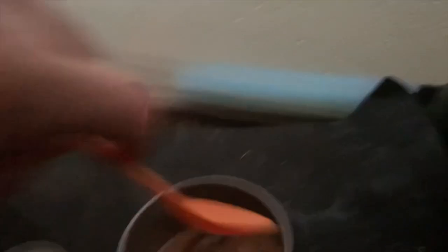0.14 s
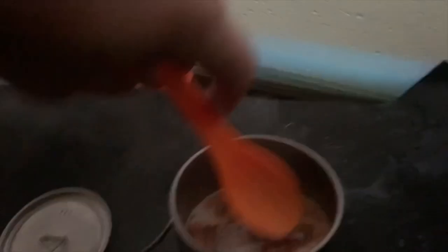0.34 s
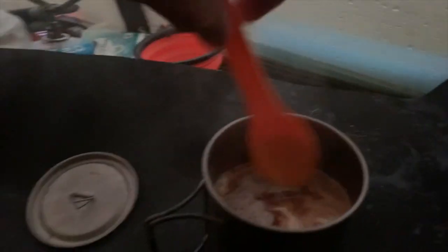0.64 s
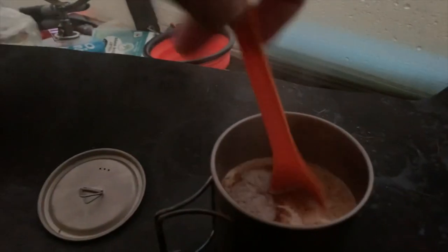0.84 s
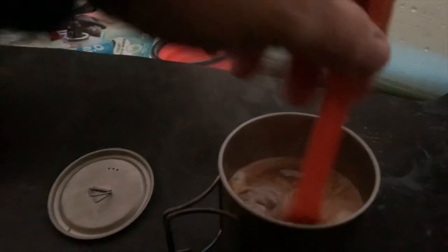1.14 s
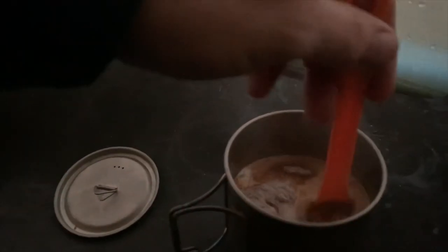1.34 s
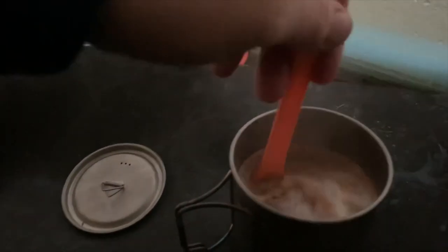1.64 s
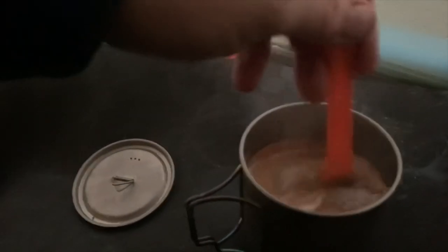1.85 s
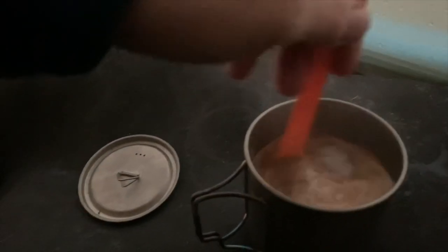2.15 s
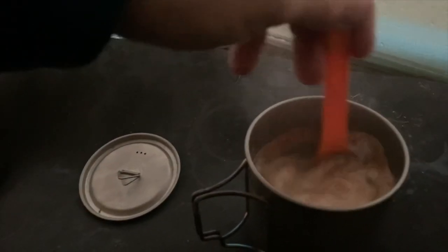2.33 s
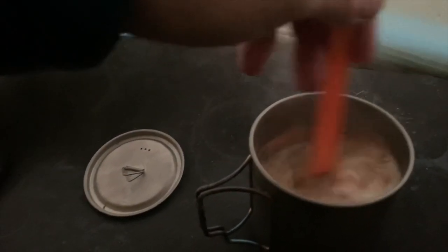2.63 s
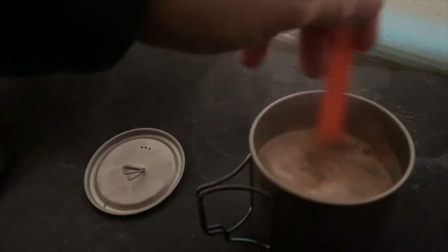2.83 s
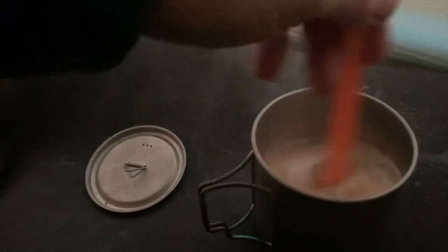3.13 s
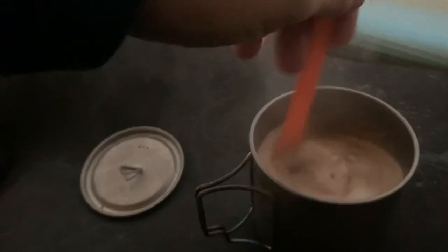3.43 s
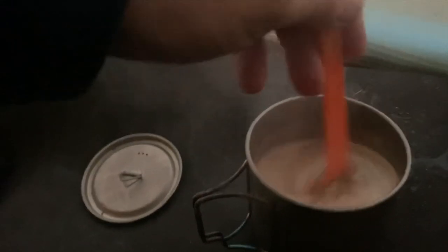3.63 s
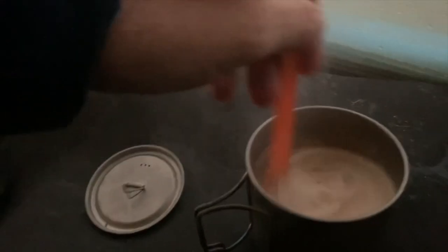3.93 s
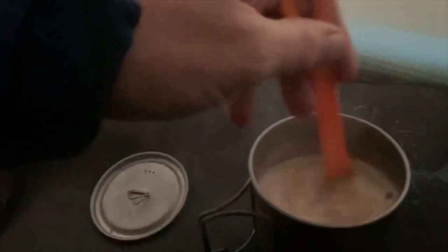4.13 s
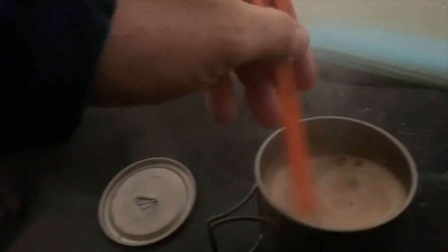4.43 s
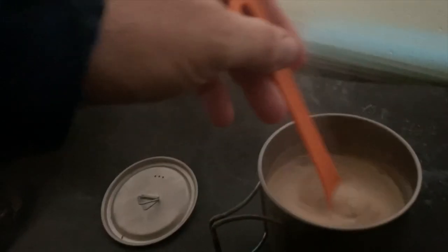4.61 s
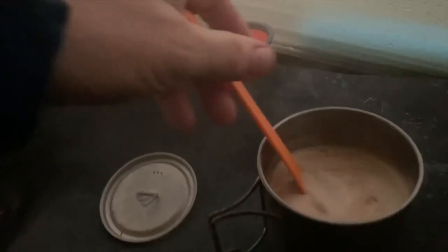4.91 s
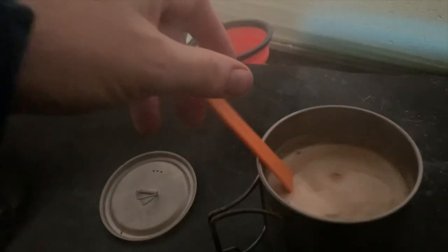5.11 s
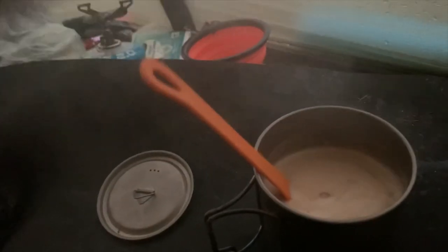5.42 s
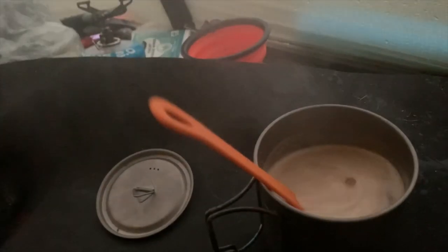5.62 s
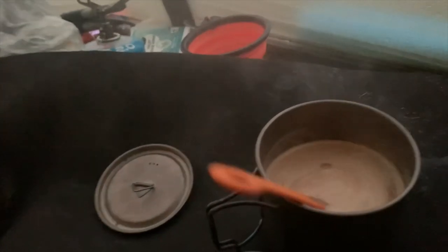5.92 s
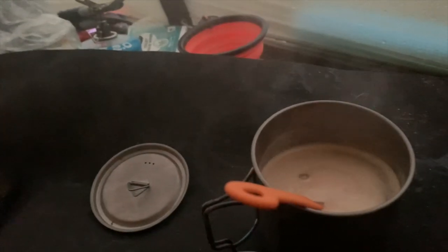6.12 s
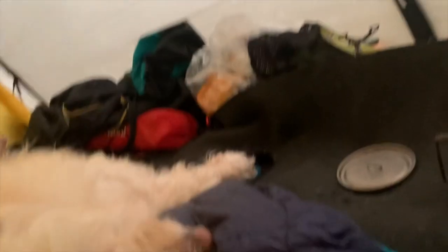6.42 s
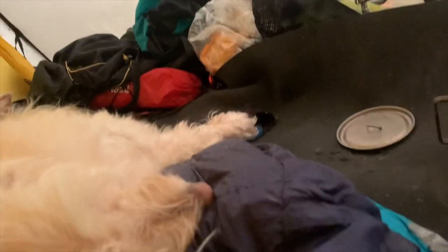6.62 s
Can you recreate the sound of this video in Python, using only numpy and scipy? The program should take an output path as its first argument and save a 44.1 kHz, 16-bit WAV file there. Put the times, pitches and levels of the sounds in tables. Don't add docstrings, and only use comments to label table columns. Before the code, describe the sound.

Inside a tent, dense rain hisses and taps on the cloth while the fly drums low in wind; finally it jumps closer and duller.

```python
import sys
import numpy as np
from scipy import signal
from scipy.fft import rfft, irfft, next_fast_len
from scipy.io import wavfile
from scipy.ndimage import uniform_filter1d

SR = 44100
rng = np.random.default_rng(int(sys.argv[2]) if len(sys.argv) > 2 else 0)


def output_pcm(signal):
    pcm = np.clip(np.atleast_2d(signal).T, -1, 1) * 32767
    wavfile.write(sys.argv[1], SR, np.round(pcm).astype(np.int16))


def nominal_scale(level):
    x = np.asarray(level, float) / 20
    return 10 ** x


N = 298116
CHANGE_S = 6.334


def evened(x):
    return x / np.sqrt(np.mean(x ** 2) + 1e-20)


def read(points, hz):
    f, value = np.transpose(points)
    return np.interp(np.log(hz + 1), np.log(f + 1), value)


def add(mix, s, sound):
    part = mix[:, round(s * SR):][:, :sound.shape[1]]
    part += sound[:, :part.shape[1]]


def shaped(x, gain):
    size = next_fast_len(N)
    spectrum = rfft(x, size) * gain(np.fft.rfftfreq(size, 1 / SR))
    return irfft(spectrum, size)[..., :N]


def wander(hz):
    return evened(shaped(rng.standard_normal(N), lambda f: 1 / (1 + (f / hz) ** 2)))


def follow(curve):
    return np.interp(np.arange(N) / SR, *np.transpose(curve))


def swells(rows, rise=1.0):
    t = np.arange(0, N, 64) / SR
    s, db, half = np.transpose(rows)[:, :, None]
    half = half * np.where((t < s) & (db > 0), rise, 1)
    bells = db * np.exp(-.5 * ((t - s) / half) ** 2)
    return np.interp(np.arange(N) / SR, t, bells.sum(0))


def splash(hz, ms, width, ring_db, rise_s=0.00046):
    t = np.arange(1024) / SR
    decay = np.exp(-t / (ms / 2000)) + 0.32 * np.exp(-t / 0.00085)
    burst = rng.standard_normal((2, 1024)) * decay * np.minimum(t / rise_s, 1)
    r = np.exp(-np.pi * width * hz / SR)
    ring = signal.lfilter([1, 0, -1], [1, -2 * r * np.cos(2 * np.pi * hz / SR), r * r], burst)
    both = burst / np.linalg.norm(burst) + nominal_scale(ring_db) * ring / np.linalg.norm(ring)
    return both / abs(both).max(1)[:, None]


# (time [s], change [dB], half length [s])
FLURRIES = [(0.075, 2.5, 0.039), (0.21, -2.5, 0.036), (0.439, -5, 0.011), (0.479, 8, 0.0053),
            (0.534, -1.5, 0.0046), (0.599, -5.5, 0.017), (0.723, -6, 0.008), (0.798, 7, 0.0072),
            (0.833, -3.5, 0.0093), (0.873, -1.5, 0.01), (0.933, 1, 0.012), (1.212, 1, 0.087),
            (1.472, -4.5, 0.024), (1.551, -1.5, 0.022), (1.611, 2.5, 0.022), (1.721, 3, 0.012),
            (1.921, -6, 0.014), (1.985, 3, 0.0083), (2.385, 5.5, 0.004), (2.444, -6, 0.02),
            (2.584, 2.5, 0.019), (2.898, 9.5, 0.0058), (2.973, 0, 0.042), (3.073, 11.5, 0.0056),
            (3.173, 8, 0.0038), (3.298, -2, 0.011), (3.452, -3, 0.0099), (3.522, 5, 0.024),
            (3.766, -2.5, 0.053), (3.971, 2.5, 0.0088), (4.036, -1, 0.011), (4.31, 3, 0.012),
            (4.879, -5, 0.03), (5.448, -10, 0.0034), (5.862, 0, 0.06), (5.946, 0.5, 0.026),
            (6.036, -5, 0.045), (6.216, -2.5, 0.018), (6.385, 1.5, 0.012), (6.505, 0.5, 0.008),
            (6.58, -1.5, 0.0053), (6.61, 0, 0.0036), (6.645, 3.5, 0.0098), (6.685, 0, 0.006),
            (6.727, 0.5, 0.0057)]


def patter(per_s=1100, spread_db=2.5, wash_db=-3, gust_db=0.22, shakes_per_s=45, count=16):
    shaken = rng.exponential(1, N) * (rng.random(N) < shakes_per_s / SR)
    shaken = signal.lfilter([1], [1, -np.exp(-1 / (0.0079 * SR))], np.minimum(shaken, 2.5))
    flurry = nominal_scale(gust_db * wander(5.3)) * nominal_scale(swells(FLURRIES, 0.6)) * np.sqrt(4.2 + shaken)
    size = nominal_scale(spread_db * np.minimum(rng.exponential(1, N), 2.6))
    size = size * (rng.random(N) < per_s / SR)
    patch = rng.integers(0, count, N)
    drops = np.zeros((2, N))
    for k, hz in enumerate(np.geomspace(450, 11000, count)):
        grain = splash(hz, rng.uniform(1, 3.2), .4, 4)
        grain = grain / np.linalg.norm(grain, axis=1, keepdims=True)
        drops += signal.oaconvolve((size * (patch == k))[None], grain, axes=1)[:, :N]
    return evened(flurry * (evened(drops) + nominal_scale(wash_db) * rng.standard_normal((2, N))))


POSITIONS = 2
# (frequency [Hz], density [dB per Hz])
RAIN = [
    [(300, 3), (450, -2), (650, -5.5), (820, 0.5), (1000, -4.5), (1250, -2.5), (1700, -1.5), (3000, -3.5),
     (4500, -2.5), (6500, -8), (7500, -8.5), (8500, -11), (11000, -10), (13000, -13), (15500, -14)],
    [(300, 13), (450, 7.5), (650, 7.5), (900, 7), (1300, 2.5), (2000, 5.5), (3000, -2.5), (4500, -6.5),
     (6500, -11.5), (7500, -11), (8500, -13), (11000, -15), (13000, -17.5), (15500, -13.5)],
]
# (time [s], level [dB])
RAINFALL = [(0.0, -45.5), (0.74, -45.5), (1.2, -43), (2.08, -44), (2.17, -43), (3.0, -47), (3.93, -45.5),
            (4.21, -44), (4.9, -43.5), (5.15, -41), (5.52, -44), (5.94, -40.5), (6.17, -39.5), (6.33, -50)]
# (time [s], level [dB])
RAINFALL_NEAR = [
    (6.337, -34.5),
    (6.46, -36),
    (6.57, -38),
    (6.76, -35.5),
]
USUAL_DB = -45
CRISP_DB, CRISP_FOLLOW = -47.5, 0.98
SPRAY_DB, SPRAY_FOLLOW = -43, 0.66
DOWNPOUR_S, DOWNPOUR_RISE_S, DOWNPOUR_CRISP_DB = 5.65, .2, 3.5
OWN_GUST_DB = 1.55


def rain(white, position, low_hz=2100, high_hz=5200):
    x = shaped(white, lambda f: nominal_scale(read(RAIN[position], f)) / (1 + (220 / (f + 1)) ** 4))
    body = shaped(x, lambda f: 1 / (1 + (f / low_hz) ** 4))
    spray = shaped(x, lambda f: 1 / (1 + (high_hz / (f + 1)) ** 4))
    crisp = x - body - spray
    swell_db = follow(np.vstack([RAINFALL, RAINFALL_NEAR])) - USUAL_DB
    t = np.arange(N) / SR
    harder_db = DOWNPOUR_CRISP_DB * np.clip((t - DOWNPOUR_S) / DOWNPOUR_RISE_S, 0, 1) * (t < CHANGE_S)
    crisp = evened(nominal_scale(OWN_GUST_DB * wander(23.0)) * crisp)
    spray = evened(nominal_scale(OWN_GUST_DB * wander(23.0)) * spray)
    return (nominal_scale(USUAL_DB + 1.0 + swell_db) * evened(body)
            + nominal_scale(CRISP_DB + CRISP_FOLLOW * swell_db + harder_db) * crisp
            + nominal_scale(SPRAY_DB + SPRAY_FOLLOW * swell_db) * spray)


TICK_MS = 6.7
STRAY_DROPS, STRAY_DROP_DB, STRAY_SPREAD_DB = 34, -32.5, 0.5
CLOTH_HZ = (775, 2950)


def strays():
    when, size, hue, span = rng.random((STRAY_DROPS, 4)).T
    low, high = CLOTH_HZ
    peak_db = STRAY_DROP_DB + STRAY_SPREAD_DB * (2 * size - 1)
    return list(zip(when * N / SR, peak_db, low * (high / low) ** hue, TICK_MS * (1.4 + 0.24 * span)))


# (time [s], peak [dB], cloth pitch [Hz], length [ms])
DROPS = [(0.032, -23.5, 1700, 55), (0.304, -28.5, 1520, 7.2), (0.531, -23.5, 1160, 4.9),
         (0.927, -21.5, 2220, 6.1), (1.326, -23.5, 1060, 21), (1.604, -26, 825, 6.1),
         (1.696, -19.5, 1100, 4.8), (1.797, -21, 1040, 7.4), (2.136, -25, 1660, 9.7), (2.164, -26, 850, 17),
         (2.405, -25, 2960, 4.7), (2.766, -20, 2400, 8.3), (2.894, -24, 840, 8.3), (3.041, -27, 1600, 6.5),
         (3.076, -25, 780, 12), (3.161, -26, 1540, 27), (3.19, -24.5, 1030, 9.4), (3.216, -31, 1320, 13),
         (3.32, -22.5, 1460, 11), (3.642, -26, 2490, 12), (3.668, -24.5, 1190, 10), (3.898, -21, 3400, 5.3),
         (4.131, -23.5, 1220, 7.6), (4.276, -22.5, 1000, 6.6), (4.338, -25, 1140, 5.6),
         (4.621, -23, 1520, 12), (4.71, -25, 1300, 13), (4.838, -24, 1290, 13), (5.372, -23.5, 1190, 5.7),
         (5.475, -22.5, 1680, 8.1),
         (5.729, -22.5, 2560, 18), (5.792, -25.5, 2780, 23), (5.832, -26.5, 1300, 50),
            (5.856, -18, 2280, 15), (5.934, -22, 2490, 28), (6.012, -20.5, 2340, 2.2),
            (6.07, -22.5, 1250, 4.3), (6.104, -22, 1460, 9.9), (6.173, -17, 2240, 5.6),
            (6.225, -20, 2940, 5.2), (6.3616, -10, 880, 2.4), (6.434, -20.5, 1090, 31),
            (6.4509, -15, 865, 4.3), (6.487, -14.5, 1240, 3), (6.536, -31, 2180, 6.8),
            (6.593, -12, 1090, 5), (6.62, -19, 1240, 6.1), (6.657, -12, 1120, 6.4), (6.698, -23, 1590, 7.4),
            (6.723, -20.5, 1090, 6.5)]
# (time [s], peak [dB], cloth pitch [Hz], length [ms])
LESSER = [(0.043, -27, 835, 8.2), (0.114, -23, 2300, 8.9), (0.217, -35, 1330, 5.4),
          (0.572, -29.5, 1790, 6.3), (0.87, -35, 842, 5.8), (1.049, -28, 2070, 7.6),
          (1.489, -39, 1270, 6.2), (1.586, -32, 1380, 5.1), (1.659, -24, 744, 5.5), (2.079, -30, 900, 7.6),
          (2.266, -30.5, 1760, 7), (2.291, -30, 850, 8), (2.382, -30, 800, 8.5), (2.476, -29.5, 2100, 11),
          (2.804, -27, 1800, 12), (3.415, -37, 780, 7.7), (3.488, -22.5, 1960, 8.6), (3.58, -26, 1910, 7.9),
          (3.958, -26.5, 1640, 8.7), (4.027, -27, 1630, 9.5), (4.037, -22.5, 762, 5.1),
          (4.227, -34.5, 775, 8), (4.517, -26, 1520, 7), (4.541, -31, 813, 6.4), (4.739, -24, 1720, 8.2),
          (4.788, -37, 1470, 5.7), (4.916, -28.5, 1110, 9.1), (5.237, -33, 1330, 7),
          (5.344, -26, 1560, 7.7), (5.911, -32, 907, 7.6), (6.01, -22.5, 2360, 7.6),
          (6.037, -24, 2130, 9.8), (6.244, -20, 3070, 8.7), (6.279, -24, 1690, 8), (6.336, -36, 810, 5.4),
          (6.343, -20.5, 980, 4), (6.474, -19.5, 1310, 7.4), (6.518, -22, 2050, 5.1), (6.559, -25, 2580, 7),
          (6.671, -21, 1410, 8.5), (6.742, -25, 953, 7), (6.594, -16, 3080, 4.4), (6.657, -19, 3130, 4),
          (6.621, -18, 630, 5), (6.411, -24, 1190, 4), (6.55, -25, 2400, 5), (6.71, -23, 2300, 4)]


def knocks():
    x = np.zeros((2, N))
    for s, db, hz, ms in DROPS + strays() + LESSER:
        add(x, s, nominal_scale(db) * splash(hz, ms, 0.36, 5.9))
    return nominal_scale(4.0) * shaped(x, lambda f: 1 / (1 + (f / 4200) ** 2) / (1 + (300 / (f + 1)) ** 2))


# (time [s], peak [dB], colour [Hz])
TICKS = [(0.0663, -16, 6860), (0.413, -23, 6480), (0.521, -21, 6140), (0.532, -13, 6240),
         (0.7914, -17.5, 10000), (0.8585, -15.5, 10700), (1.104, -15.5, 10400), (1.51, -19.5, 7200),
         (1.607, -16, 6510), (1.709, -12.5, 7150), (1.796, -15.5, 6900), (2.038, -15, 10000),
         (2.385, -22, 5630), (2.582, -18, 6960), (2.766, -19.5, 6450), (2.806, -17, 10200),
         (2.893, -13.5, 7000), (3.042, -16.5, 8200), (3.0756, -20, 7300), (3.164, -12, 5860),
         (3.2152, -14, 10300), (3.375, -16, 7400), (3.9526, -23, 6530), (4.132, -17.5, 7100),
         (4.502, -14, 6840), (4.623, -14.5, 6340), (5.182, -15, 6160), (5.3706, -15.5, 10400),
         (5.8334, -14.5, 6550), (6.4513, -16, 6150), (6.5947, -12, 4540), (3.3255, -20, 9100),
         (6.173, -34, 9150)]
# (time [s], peak [dB], colour [Hz])
FAINT_TICKS = [(0.2464, -27, 6500), (0.383, -28, 6750), (0.5721, -38, 7410), (0.616, -35, 9000),
               (0.926, -31, 6000), (0.9353, -28, 6160), (1.0208, -28.5, 6300), (1.1496, -25, 6600),
               (1.2255, -27.5, 6150), (1.5873, -27, 5840), (2.224, -26, 10100), (3.1893, -29, 7100),
               (3.2673, -30, 6030), (3.3243, -34, 6890), (3.488, -27, 9870), (3.5287, -31, 6830),
               (3.8965, -41, 11400), (4.0373, -27.5, 6100), (4.1574, -27.5, 6400), (4.2274, -24.5, 6340),
               (4.3595, -28, 6340), (4.53, -35, 6750), (4.788, -32, 6900), (5.035, -34, 5930),
               (5.112, -26, 11100), (5.238, -31, 7340), (5.4717, -32, 6230), (5.9215, -31, 7310),
               (6.0686, -29, 10200), (6.175, -43, 5630), (6.335, -32, 6500), (6.5926, -29, 6020),
               (0.541, -36, 7000), (2.02, -31, 7000), (3.9809, -26, 8050), (4.543, -30, 9000),
               (4.238, -31, 7000), (4.71, -33, 6960), (3.173, -31, 7000), (6.674, -29.5, 5000),
               (6.622, -27, 5900)]
FAINT_LIFT_DB = 8


def ticks():
    x = np.zeros((2, N))
    for s, db, hz in TICKS:
        add(x, s, nominal_scale(db) * splash(hz, TICK_MS, 0.047, -11.5, 0.00022))
    for s, db, hz in FAINT_TICKS:
        add(x, s, nominal_scale(db + FAINT_LIFT_DB) * splash(hz, TICK_MS, 0.18, -7.5, 0.00029))
    return nominal_scale(1.0) * shaped(x, lambda f: 1 / (1 + (2500 / (f + 1)) ** 2) / (1 + (f / 11000) ** 2))


# (time [s], peak [dB], pitch [Hz])
SLAPS = [(0.478, -24.5, 134), (0.823, -32.5, 161), (1.63, -33, 122), (1.74, -22.5, 108), (3.316, -24, 118),
         (3.586, -21.5, 96.4), (3.669, -23, 345), (4.111, -30, 330), (4.272, -22.5, 105), (4.441, -33, 152),
         (5.219, -27, 190), (5.71, -26, 173), (5.836, -23, 180), (5.96, -38, 180), (6.34, -26, 445),
         (6.586, -40, 109), (6.618, -24, 126)]
# (time [s], peak [dB], pitch [Hz])
PLOPS = [(1.319, -47, 626), (1.623, -30, 375), (1.993, -34, 344), (3.194, -30.5, 298), (3.319, -27, 507),
         (4.037, -34, 775), (4.276, -29, 404), (4.277, -28, 582), (4.653, -30.5, 303), (4.838, -32, 673),
         (5.412, -37, 323), (6.362, -26, 363), (6.45, -24, 565), (6.594, -23.5, 367), (6.656, -27, 474)]


def slaps():
    x = np.zeros((2, N))
    t = np.arange(3000) / SR
    for s, db, hz in SLAPS + PLOPS:
        tone = np.sin(2 * np.pi * hz * t) * np.exp(-t * (hz + 260) / 5.34)
        add(x, s, nominal_scale(db - 2.0) * tone[None])
    return x


# (frequency [Hz], density [dB per Hz])
DRUM = [(12, -42), (20, -28.5), (45, 1), (76, 3), (186, -6.5), (300, -17), (390, -50), (660, -120)]
# (time [s], level [dB])
WIND = [(0.0, -38.5), (0.28, -36.5), (0.36, -37), (0.9, -38), (1.24, -33.5), (1.45, -33), (1.76, -31.5),
        (2.2, -35), (2.75, -33.5), (3.18, -34.5), (3.31, -36), (3.54, -37.5), (3.68, -40), (3.96, -40),
        (4.69, -35.5), (5.61, -34), (6.36, -33), (6.76, -36)]
# (time [s], change [dB], half length [s])
HEAVES = [(0.105, -7.5, 0.086), (0.254, -9, 0.031), (0.354, 1.5, 0.04), (0.449, -2.5, 0.018),
          (0.464, 3.5, 0.058), (0.524, 4, 0.023), (0.713, -2.5, 0.023), (0.998, -2, 0.085),
          (1.302, 3, 0.074), (1.447, -3, 0.034), (1.527, 1, 0.025), (1.641, 0.5, 0.064),
          (1.916, -3.5, 0.022), (2.15, -3.5, 0.12), (2.639, -7, 0.028), (2.968, -0.5, 0.064),
          (3.168, -7, 0.036), (3.322, 3.5, 0.028), (3.512, -2, 0.029), (3.597, 6, 0.016), (3.702, 6, 0.029),
          (3.846, -1, 0.028), (3.966, -1, 0.023), (4.056, 2.5, 0.019), (4.091, -3.5, 0.075),
          (4.295, 8, 0.016), (4.734, 3, 0.044), (4.974, 5, 0.017), (5.448, 2, 0.025), (5.577, -5.5, 0.11),
          (6.076, -7.5, 0.025), (6.191, 3.5, 0.059)]


def drumming(lumps_db=1.33, steady=0.38):
    boom = shaped(rng.standard_normal((2, N)), lambda f: nominal_scale(read(DRUM, f)))
    power = uniform_filter1d(uniform_filter1d(boom[0] ** 2, size=1500), size=1500)
    boom = boom / power ** (steady / 2)
    return nominal_scale(follow(WIND) + swells(HEAVES) + lumps_db * wander(29.0)) * evened(boom)


# (frequency [Hz], left minus right [dB])
LEAN = [
    [(100, -0.7), (200, 0.1), (300, 0.1), (400, -3.2), (550, -6), (700, -5), (900, -2.2), (1300, -0.4),
     (2000, -0.6)],
    [(100, 1.8), (200, 3.0), (300, 7.9), (400, 5.9), (550, 2.1), (700, -0.4), (900, -2.3), (1300, 1.7),
     (2000, 0.4)],
]
# (frequency [Hz], likeness [0-1])
ALIKE = [
    [(200, .99), (330, .45), (480, .27), (800, .65), (1300, .38), (2500, .42), (3500, .55), (4400, .9),
     (6000, .8), (15000, .79)],
    [(200, .9), (350, .4), (700, .7), (1500, .55), (3000, .25), (6000, .3), (9000, .8), (15000, .85)],
]
# (frequency [Hz], lag [half turns])
LAG = [
    [(250, 0), (500, -.3), (700, -.1), (1050, -.4), (1700, 0), (2500, .45), (3400, .4), (4720, 1),
     (15250, 6)],
    [(250, 0), (500, -.5), (1100, 0), (1600, .3), (2500, .1), (4000, .4), (7800, .5), (9800, 1),
     (12300, 1.9), (14300, 2.1), (15800, 3)],
]


def ports(paths, position):
    def same(f):
        return np.clip(read(ALIKE[position], f), 0, 1)

    def late(f):
        return np.exp(-1j * np.pi * np.interp(f, *np.transpose(LAG[position])))

    left = shaped(paths[0], lambda f: nominal_scale(read(LEAN[position], f) / 2))
    right = shaped(paths[0], lambda f: same(f) * late(f))
    right = right + shaped(paths[1], lambda f: np.sqrt(1 - same(f) ** 2))
    return np.array([left, shaped(right, lambda f: nominal_scale(-read(LEAN[position], f) / 2))])


def scene():
    white = patter()
    rest = knocks() + ticks() + slaps() + drumming()
    far, near = (ports(rain(white, k) + rest, k) for k in range(POSITIONS))
    return np.where(np.arange(N) / SR < CHANGE_S, far, near)


BANDS = np.r_[0:40:4, 40:96:8, 96:144:12, 144, 160, 176, 196, 216, 240, 264, 292, 320:960:32]
# (frequency [Hz], level [dB])
WEAK = [(3600, -16), (4000, -6), (4430, -4.5), (4900, -4.5), (5400, -7), (6600, -3.5), (11000, -3.5),
        (13500, -3), (14300, -1.2), (14800, 1)]
# (frequency [Hz], step [dB])
STEP = [(300, -20), (1000, -11), (2000, -5), (3400, -4), (6000, -5), (10000, -4), (15000, -2)]
SHARP = [.063, .411, .527, .573, .62, .782, .852, 1.107, 1.502, 1.711, 2.036, 2.385, 2.756, 2.802, 2.895,
         3.035, 3.081, 3.151, 3.197, 3.22, 3.313, 3.894, 3.963, 4.126, 4.544, 4.637, 5.125, 5.357, 5.38,
         5.473, 6.193, 6.332]
EDGE_HZ = 15880
STARVED_DB, STEP_DRIFT_DB = 11, 1.5
FRINGE_DB, FRINGE_STEP_DB = -4, 0


def thrift(x):
    frames, line = N // 1024 + 3, np.arange(1024)
    pair = np.zeros((2, frames * 1024 + 1024))
    pair[:, 1338:1338 + N] = x[0] + x[1], x[0] - x[1]
    basis = np.cos(np.pi / 1024 * (np.arange(2048)[:, None] + 512.5) * (line + .5))
    basis *= signal.windows.kaiser_bessel_derived(2048, 4 * np.pi)[:, None]
    halves = pair.reshape(2, -1, 1024)
    z = halves[:, :-1] @ basis[:1024] + halves[:, 1:] @ basis[1024:]

    band = np.searchsorted(BANDS, line, "right") - 1
    hz = (line + .5) * SR / 2048
    rms = np.sqrt(np.add.reduceat(z ** 2, BANDS, axis=2) / np.bincount(band) + 1e-18)
    middle = np.add.reduceat(hz, BANDS) / np.bincount(band)
    drift = nominal_scale(STEP_DRIFT_DB * wander(3.0)[np.minimum(np.arange(frames) * 1024, N - 1), None])
    slow = uniform_filter1d(rms, size=3, axis=1)
    weak = slow < nominal_scale(read(WEAK, middle)) * slow[::-1]
    step = drift * np.where(weak, nominal_scale(STARVED_DB) * rms[::-1], nominal_scale(read(STEP, middle)) * rms)
    step = step[:, :, band]
    near = uniform_filter1d(z ** 2, size=13, axis=2)
    close = near > nominal_scale(2 * np.maximum(read(WEAK, hz), FRINGE_DB)) * near[::-1]
    step = np.where(weak[:, :, band] & close, nominal_scale(FRINGE_STEP_DB) * rms[::-1][:, :, band], step)

    rounded = np.sign(z) * step * np.floor((abs(z) / step) ** .75 + .4054) ** (4 / 3)
    kept = np.round((np.array(SHARP) * SR + 314) / 1024).astype(int)
    rounded[:, kept] = z[:, kept]
    rounded[:, :, hz > EDGE_HZ] = 0
    out = np.zeros_like(halves)
    out[:, :-1] += rounded @ basis[:1024].T
    out[:, 1:] += rounded @ basis[1024:].T
    mid, side = out.reshape(2, -1)[:, 1338:1338 + N] / 1024
    return np.array([mid + side, mid - side])


def low_pass(x):
    return signal.sosfilt(signal.butter(12, 15950, fs=SR, output="sos"), x)


def record(dry):
    return low_pass(thrift(dry))


dry = scene()
out = record(dry)
output_pcm(out)
```